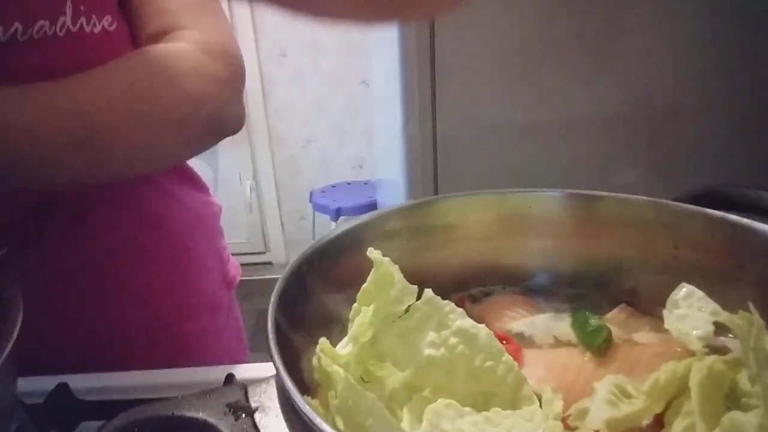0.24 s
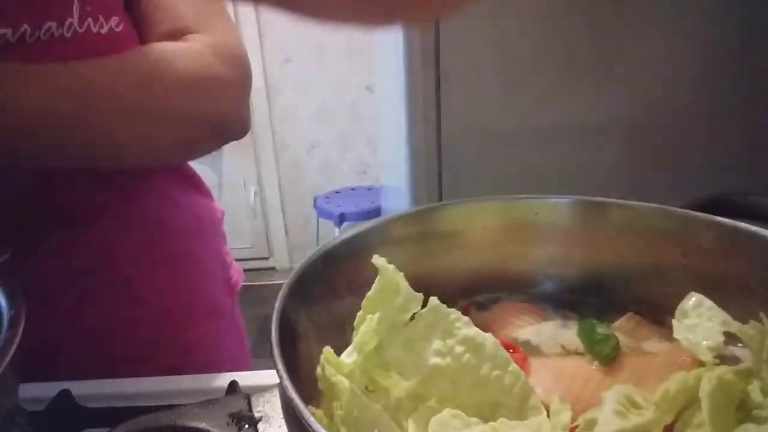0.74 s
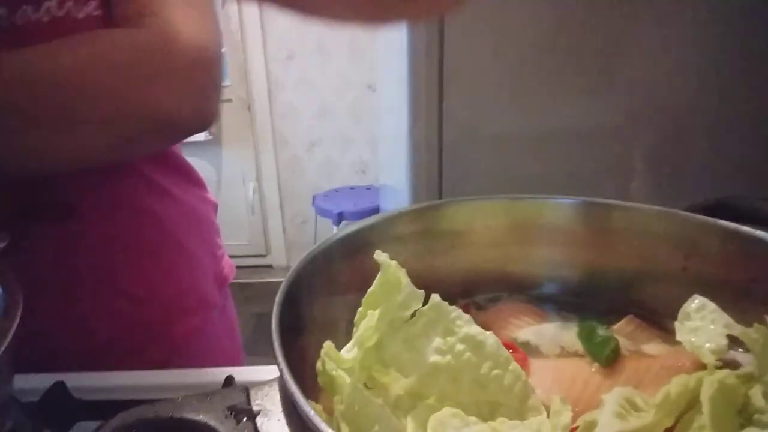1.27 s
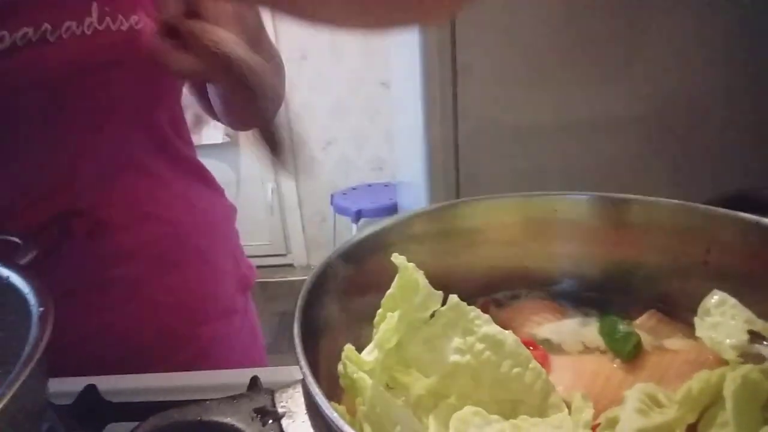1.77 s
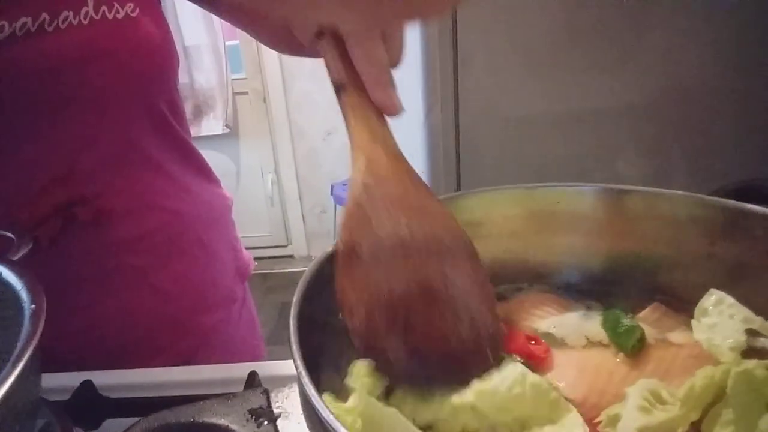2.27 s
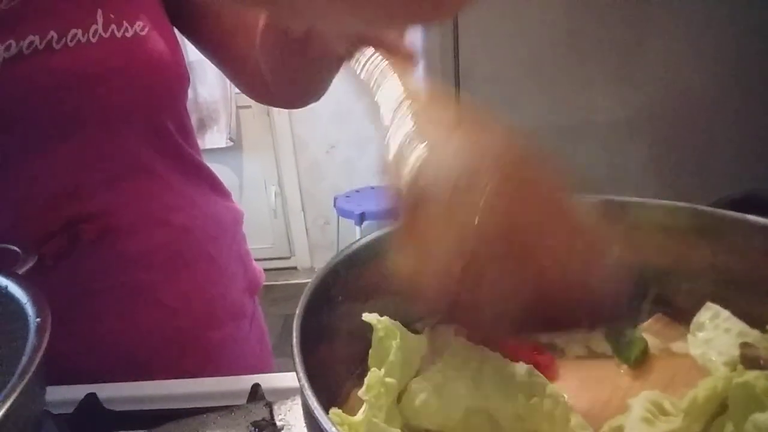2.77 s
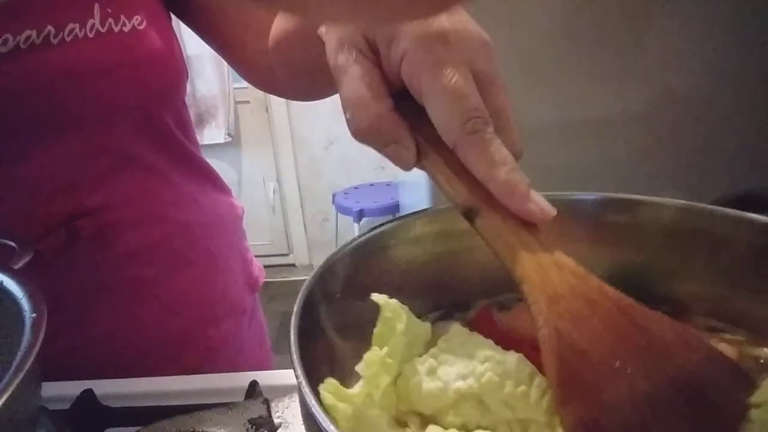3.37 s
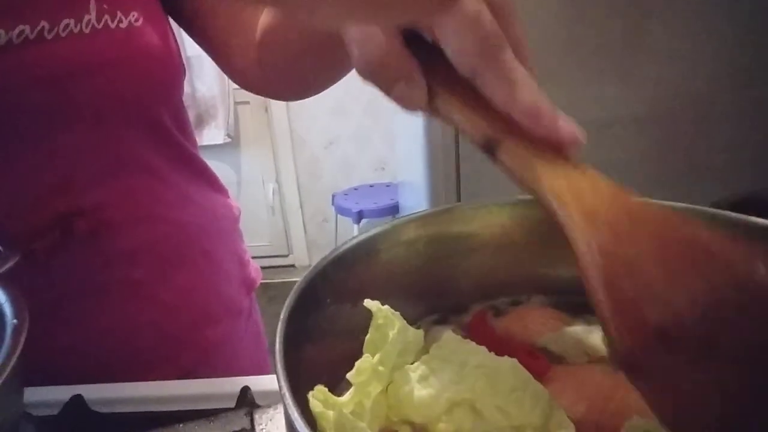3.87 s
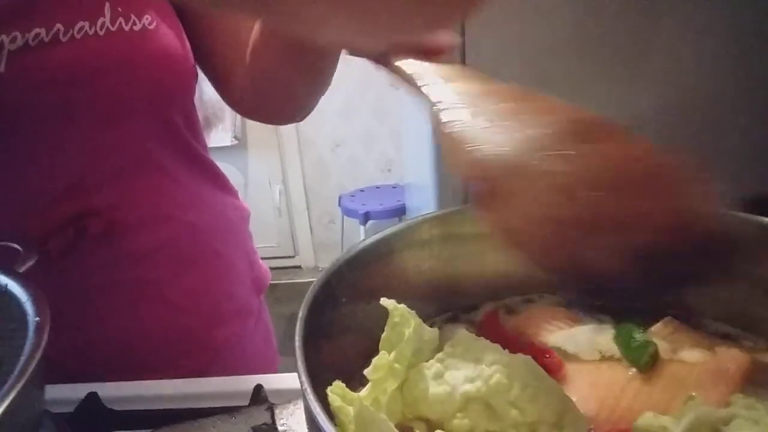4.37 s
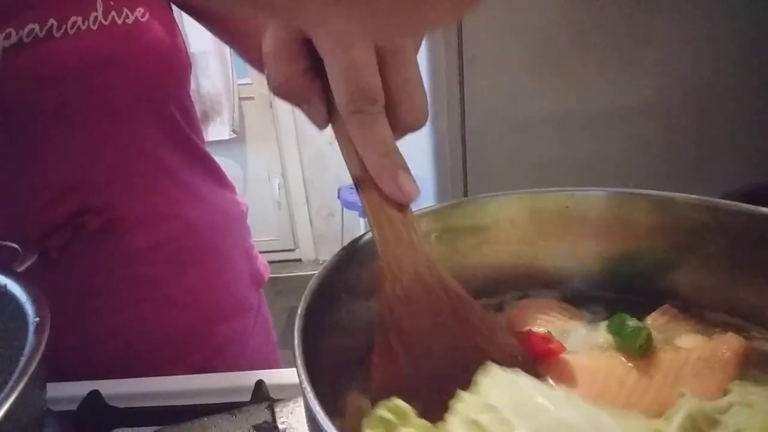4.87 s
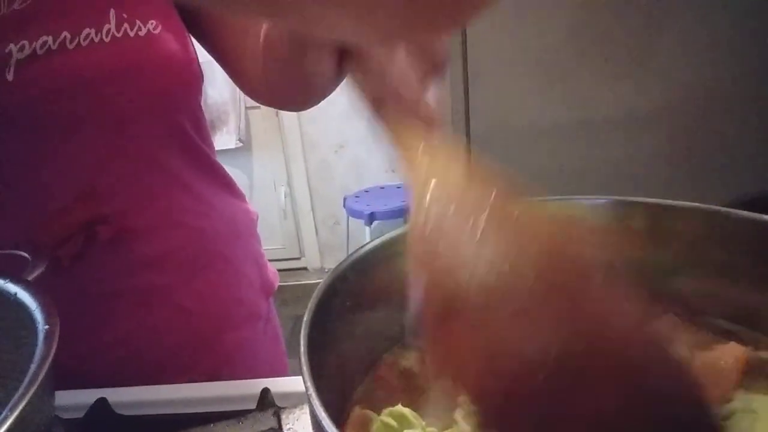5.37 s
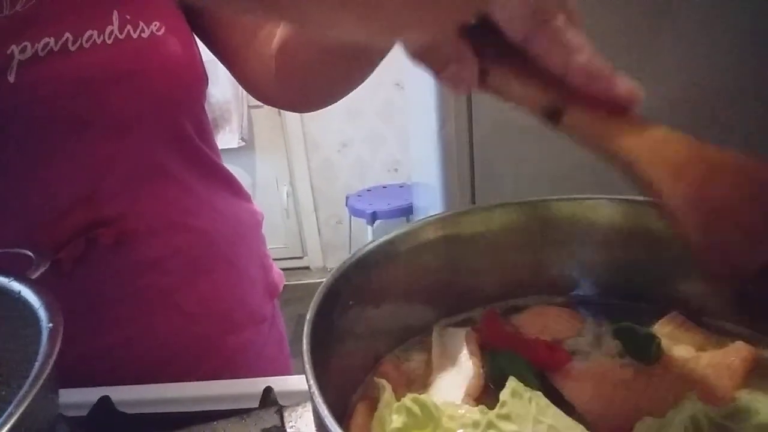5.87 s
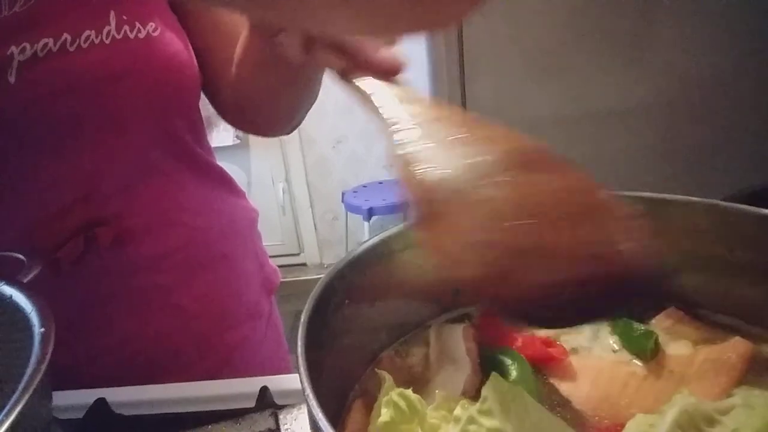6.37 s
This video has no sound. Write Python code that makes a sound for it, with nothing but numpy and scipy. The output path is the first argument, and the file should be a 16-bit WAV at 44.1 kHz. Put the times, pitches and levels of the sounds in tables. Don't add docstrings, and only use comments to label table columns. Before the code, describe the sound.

Wet leaves crackle softly under a wooden spoon, then two hard, short-ringing knocks on a full steel pot with broth splashes, over steady fan hum.

```python
import sys
import numpy as np
from scipy import signal
from scipy.fft import rfft, irfft, next_fast_len
from scipy.io import wavfile
from scipy.ndimage import map_coordinates

SR = 44100
rng = np.random.default_rng(int(sys.argv[2]) if len(sys.argv) > 2 else 0)


def invert_db(x):
    u = np.asarray(x, float) / 20
    return 10 ** u


def generate_wav(sig):
    pcm = np.round(np.clip(np.atleast_2d(sig).T, -1, 1) * 32767).astype(np.int16)
    wavfile.write(sys.argv[1], SR, pcm)


N = 292824

# frequency in Hz, level in dB rms, line width in Hz.
FAN_TONES = [(96.6, -54, 7.6), (169.7, -56, 9), (247, -60, 12)]
# frequency in Hz, density in dB per Hz.
FAN_AIR = [(18, -34), (40, -12), (70, -5.5), (130, -2), (220, -7.5), (400, -12), (950, -16), (2100, -15.5),
           (2900, -19.5), (3400, -27.5), (6500, -30.5), (12900, -36.5), (13300, -37.5), (15700, -34.5)]
# frequency in Hz, width in Hz, level in dB above the air.
HOOD_MODES = [(300, 19, 1), (740, 91, 8), (1040, 8.4, 12.5), (1342, 59, 11), (1400, 29, -5),
              (1470, 31, 8.5), (1571, 30, 15), (1640, 26, 8), (1860, 15, 5.5), (2662, 48, 15),
              (4100, 300, 10.5), (5330, 26, 15), (6300, 58, -3), (7300, 52, 3), (8000, 390, -1),
              (9800, 50, 6), (11080, 60, 9.5), (11880, 220, 7), (12500, 550, 6.5)]
FAN_DB = -47.5

# loudest moment in seconds, stroke in seconds, crackle in dB, wet share in dB.
RUSTLE = [(.33, 0.14, -69, 2), (1.08, 0.036, -58, -5), (1.19, 0.042, -52, 2.5), (1.309, 0.025, -48.5, 4.5),
          (1.48, .018, -49, 2.5), (2.14, .11, -54, -4), (2.34, 0.035, -51, -3), (2.43, 0.059, -48, -2.5),
          (2.51, 0.053, -54.5, -2), (3.15, 0.056, -47.5, 2), (3.2, 0.019, -60, 2), (3.31, .074, -54.5, 5),
          (3.48, .04, -61, 6), (3.9, .18, -61, 4), (4.72, 0.1, -59.5, 6), (5.44, 0.049, -59, 7),
          (6.04, .055, -52, 1.5), (6.61, .03, -66, -3)]
# frequency in Hz, density in dB per Hz.
CRACKLE = [(1760, -13), (3000, -17), (4870, 1.5), (6500, -5), (8600, -2), (9300, -8), (15500, -8)]
# frequency in Hz, density in dB per Hz.
WET = [(500, -40), (1000, -17), (2200, -0.5), (4200, -3), (7000, -11.5), (12000, -54)]
RISE_SHARE, FALL_SHARE = 0.7, 1.3

# start in seconds, peak in dB, centre in Hz.
SNAPS = [(.3194, -43, 4620), (.428, -41, 4000), (1.035, -39.5, 3980), (1.067, -27, 5750),
         (1.112, -40, 6950), (1.1617, -42, 4500), (1.249, -41, 6460), (1.3861, -40.5, 4100),
         (2.319, -37, 5330), (3.082, -41, 7000), (3.161, -34, 5900), (3.82, -47, 5000), (4.236, -44, 7900),
         (4.975, -47, 5500), (5.008, -45, 5000), (5.176, -45, 7760), (5.415, -44, 5500), (5.437, -37, 5460),
         (6.617, -42, 5500)]
# start in seconds, peak in dB, centre in Hz.
SCRAPES = [(1.175, -32.5, 4070), (1.204, -37, 5500), (1.3085, -36, 4500), (1.473, -35, 3500),
           (3.0493, -31, 2700), (3.127, -36, 3000), (3.138, -36, 2200), (3.187, -27, 3480),
           (3.198, -37, 3580), (3.287, -31.5, 2200), (3.304, -34, 2100)]
# start in seconds, peak in dB, centre in Hz.
SPLITS = [(1.304, -31, 5830), (2.096, -42, 6500), (2.1117, -39, 7500), (2.1334, -44, 8000),
          (2.345, -39, 4840), (2.397, -36, 5750), (2.4225, -32, 8050), (2.5031, -32, 6000),
          (3.4494, -47, 5500), (3.9018, -42, 5500), (5.7123, -38, 7300), (1.181, -42, 7500),
          (1.472, -42, 11000)]
# start in seconds, peak in dB, centre in Hz.
DRIPS = [(1.426, -44, 6000), (3.573, -48, 12500), (1.4526, -35, 6040), (2.3757, -49, 7850),
         (2.475, -39, 9050), (3.541, -43, 12000), (4.7008, -36, 10000), (4.7757, -27, 6600),
         (4.805, -37, 5000), (5.2694, -52, 9000), (5.3792, -45, 9000), (5.4827, -31.5, 7000)]
# start in seconds, peak in dB, centre in Hz.
SPLASHES = [
    (4.6488, -22.5, 7300),
    (4.6492, -29, 4400),
    (4.7108, -28, 4900),
    (4.751, -38, 5500),
    (5.9078, -22, 6300),
    (6.0189, -14.5, 5200),
    (6.0186, -21, 11800),
    (6.0187, -21, 2700),
]
# body in dB, air in dB, t60 in seconds, attack in seconds, opening tick in dB.
SNAP_KIND = (-16, -21, .045, .0025, -20)
SCRAPE_KIND = (0, -27, .028, .0006, 4)
SPLIT_KIND = (-5, -10, .035, .003, -20)
DRIP_KIND = (-12, 1, .02, .0002, 6)
SPLASH_KIND = (-4, -16, .04, .0002, 5)
TICK_T60_S = 0.0054

# start in seconds, peak in dB, resonance in Hz.
SHOVES = [(.351, -42, 360), (1.07, -33.5, 410), (1.16, -34, 300), (1.17, -35, 553), (1.298, -27, 1040),
          (1.33, -34, 90), (1.47, -26, 288), (2.149, -35, 350), (2.2, -43, 230), (2.27, -35, 405),
          (2.63, -38, 620), (3.13, -30.5, 70), (3.3, -39, 80), (3.45, -38, 270), (3.799, -48, 406),
          (6.611, -30, 240), (6.612, -22, 111), (6.614, -27, 70)]
# start in seconds, peak in dB, resonance in Hz.
ROCKING = [(4.585, -21, 410), (4.6, -34, 203), (4.602, -25, 1350), (4.61, -40, 705), (4.66, -34, 1000),
           (4.671, -24.5, 340), (4.71, -32, 473), (4.72, -30, 200), (4.73, -29.5, 300), (4.76, -37.5, 475),
           (5.91, -13.5, 545), (5.93, -24.5, 408), (5.941, -12.5, 270), (5.95, -35, 1400),
           (5.96, -35, 1950), (6.05, -36, 203)]
# t60 in seconds at the middle resonance, exponent lengthening low ones.
SHOVE_RING = (0.13, 0.3)
ROCK_RING = (0.23, .05)
MIDDLE_HZ = 400
HARD_DB, LINGER = -28.5, 0.3

# start in seconds, blow in dB, stove thud in dB, tail in dB, crack in dB.
KNOCKS = [
    (4.5503, 1, -34.5, -24, -17.5),
    (5.8966, 4, -36, -19, -28),
    (6.6072, -22.5, -48.5, -39, -25),
]
# frequency in Hz, width in Hz, level in dB.
RIM_FAR = [(340, 33, -28), (410, 20, -31), (610, 30, -30), (704, 28, -12), (1000, 44, -12), (1180, 33, -34),
           (1350, 31, 6.5), (1440, 42, 3), (1600, 80, -4), (1878, 54, 0), (2006, 28, -7), (2490, 60, -11),
           (2650, 85, -10), (3470, 110, -15), (3740, 120, -10), (4240, 200, -16), (5440, 210, -14),
           (7900, 760, -8)]
# frequency in Hz, width in Hz, level in dB.
RIM_NEAR = [(230, 90, -25), (270, 20, 0), (407, 25, -16), (545, 40, 11), (620, 25, -1), (820, 50, -16),
            (1020, 42, -3), (1343, 14, 11.5), (1490, 42, 8), (1630, 46, -3), (1940, 62, -2),
            (2193, 77, 6.5), (2220, 59, -6), (2404, 67, 1.5), (2500, 63, 4), (2650, 160, -32),
            (3550, 100, -20), (4170, 260, -32), (4930, 240, -11), (6900, 400, -29)]
# frequency in Hz, width in Hz, level in dB.
RIM_SOFT = [(230, 80, -8), (704, 140, 5), (1130, 220, -6), (1510, 230, 0), (2070, 400, -11)]
# delay in seconds, level in dB.
WALLS = [(.0029, -11), (.0085, -7), (0.01, -7), (0.021, -14.5)]
ECHO_DB = -4
# frequency in Hz, t60 in seconds.
KITCHEN = [(80, 0.95), (250, 0.31), (700, 0.43), (2000, 0.27), (5000, 0.23), (12000, 0.23)]
# frequency in Hz, density in dB per Hz.
TAIL_FAR = [(71, -32), (120, -9), (246, -3.5), (410, 5), (503, -18), (712, 2.5), (856, -4.5), (2020, 1.5),
            (2240, -7), (2590, -6), (3050, -7), (8140, -16), (16000, -46)]
# frequency in Hz, density in dB per Hz.
TAIL_NEAR = [(71, -26), (120, -13), (196, -16), (261, -7.5), (370, -12), (410, -13), (839, -24),
             (1370, -13.5), (1720, -15), (1980, -15), (2200, -18), (2530, -23), (16000, -58)]
# frequency in Hz, t60 in seconds, level in dB.
STOVE = [(78.4, 0.52, 1.5), (101.6, 0.3, -2), (134, 0.35, -3.5)]
EDGE_HZ, EDGE_DB = 9200, -7

# frequency in Hz, gain in dB.
TOP_LIMIT = [(15720, 0), (15800, -38), (16900, -40), (17000, -90)]
# start in seconds, depth in dB (negative lifts), release in seconds.
DUCK = [
    (4.55, 4.5, 3.7),
    (5.896, -0.5, 2),
]


def unit(x):
    return x / np.sqrt(np.mean(x ** 2) + 1e-20)


def along(points, hz):
    f, v = np.transpose(points)
    return np.interp(np.log(hz + 1), np.log(f + 1), v)


def filtered(x, response):
    m = next_fast_len(len(x) + SR // 10)
    return irfft(rfft(x, m) * response(np.fft.rfftfreq(m, 1 / SR)), m)[..., :len(x)]


def peak(f, hz, width_hz):
    return 1j * f * width_hz / (hz * hz - f * f + 1j * f * width_hz)


def wobble(rate):
    knots = rng.standard_normal(int(N * rate / SR) + 4)
    return map_coordinates(knots, [np.arange(N) * rate / SR])


def add(track, s, sound):
    part = track[round(s * SR):][:len(sound)]
    part += sound[:len(part)]


def tail(colour):
    hz, t, z = signal.stft(rng.standard_normal(SR // 2), SR, nperseg=512)
    decay_db = along(colour, hz)[:, None] - 60 * t / along(KITCHEN, hz)[:, None]
    answer = signal.istft(z * invert_db(decay_db), SR, nperseg=512)[1]
    answer = answer * (1 - np.exp(-np.arange(len(answer)) / SR / 0.0027))
    return answer / np.linalg.norm(answer)


def fan():
    def hood(f):
        gain = sum(invert_db(2 * db) * abs(peak(f, c, w)) ** 2 for c, w, db in HOOD_MODES)
        return invert_db(along(FAN_AIR, f)) * np.sqrt(1 + gain)

    level_db = FAN_DB + 0.33 * wobble(2.01) + 0.64 * wobble(14)
    out = invert_db(level_db) * unit(filtered(rng.standard_normal(N), hood))
    t = np.arange(N) / SR
    for hz, db, width_hz in FAN_TONES:
        sway = 1 + 0.44 * (wobble(width_hz) + 1j * wobble(width_hz))
        out += invert_db(db + 2.5) * np.real(sway * np.exp(2j * np.pi * hz * t))
    return out


def rustle():
    t = np.arange(0, N + 64, 64) / SR
    dry_gain, wet_gain = np.zeros(len(t)), np.zeros(len(t))
    for s, stroke, db, wet_db in RUSTLE:
        side_s = stroke * np.where(t < s, RISE_SHARE, FALL_SHARE)
        swell = np.exp(-((t - s) / side_s) ** 2)
        dry_gain += invert_db(db) * swell
        wet_gain += invert_db(db + wet_db) * swell

    def grains(colour):
        clumped = rng.standard_normal(N) * invert_db(2.6 * wobble(70) + 2.3 * wobble(900))
        return unit(filtered(clumped, lambda f: invert_db(along(colour, f))))

    now = np.arange(N) / SR
    return np.interp(now, t, dry_gain) * grains(CRACKLE) + np.interp(now, t, wet_gain) * grains(WET)


def snaps():
    out, t = np.zeros(N), np.arange(SR // 8) / SR
    kinds = ((SNAPS, SNAP_KIND), (SCRAPES, SCRAPE_KIND), (SPLITS, SPLIT_KIND),
             (DRIPS, DRIP_KIND), (SPLASHES, SPLASH_KIND))
    events = [row + kind for rows, kind in kinds for row in rows]
    for s, db, hz, body_db, air_db, t60, attack_s, tick_db in events:
        def colour(f):
            ripple = 1 + 0.75 * peak(f, 8100, 680) - 0.49 * peak(f, 1.182 * hz, 0.14 * hz)
            band = peak(f, hz, 0.8 * hz) ** 3 * ripple
            body = invert_db(body_db + 1.0) * peak(f, 1740, 1570) ** 2
            air = invert_db(air_db) * peak(f, 11900, 6300) ** 3
            return band + body - air

        decay = invert_db(-60 * t / t60) + invert_db(tick_db - 60 * t / TICK_T60_S)
        burst = rng.standard_normal(len(t)) * decay * (1 - np.exp(-t / attack_s))
        sound = filtered(burst, colour)
        add(out, s, invert_db(db) * sound / abs(sound).max())
    room = signal.oaconvolve(out, tail([(100, 0)])[:SR // 4])[:N]
    return out + invert_db(-6.0) * room


def bumps():
    out, t = np.zeros(N), np.arange(SR // 3) / SR
    for s, db, hz, ring_s, low in [row + SHOVE_RING for row in SHOVES] + [row + ROCK_RING for row in ROCKING]:
        t60 = ring_s * (MIDDLE_HZ / hz) ** low * invert_db(LINGER * (HARD_DB - db))

        def resonance(f):
            return (peak(f, hz, 0.07 * hz + 10) + 0.3) * peak(f, hz, 0.9 * hz) ** 2

        puff = unit(filtered(rng.standard_normal(len(t)), resonance))
        add(out, s, invert_db(db - 7.0 - 60 * t / t60) * puff * (1 - np.exp(-t / 0.011)))
    return out


def knocks():
    out, t = np.zeros(N), np.arange(SR // 2) / SR
    blow = t * np.exp(-t / 0.00005)
    rims, colours = (RIM_FAR, RIM_NEAR, RIM_SOFT), (TAIL_FAR, TAIL_NEAR, TAIL_NEAR)
    for (s, db, thud_db, tail_db, crack_db), rim, colour in zip(KNOCKS, rims, colours):
        def body(f):
            total = 0
            for hz, width_hz, mode_db in rim:
                sign = 1 if hz < 1200 or hz > 3000 else -1
                total = total + sign * invert_db(mode_db) * peak(f, hz, width_hz)
            return total * peak(f, 2350, 4700)

        ring = filtered(blow, body)
        crack_burst = rng.standard_normal(len(t)) * invert_db(-60 * t / 0.034)
        crack = filtered(crack_burst, lambda f: peak(f, 3700, 3600) ** 2)
        knock = invert_db(db) * (ring / abs(ring).max() + invert_db(crack_db) * crack)
        add(out, s, knock)
        for delay, echo_db in WALLS:
            add(out, s + delay, invert_db(echo_db + ECHO_DB) * knock)
        add(out, s, invert_db(tail_db + 32) * tail(colour))
        boom = sum(invert_db(g - 60 * t / t60) * np.sin(2 * np.pi * hz * t) for hz, t60, g in STOVE)
        add(out, s, invert_db(thud_db + 15.5) * boom * (1 - np.exp(-t / 0.052)) ** 2)

    def knock_colour(f):
        shelf_db = EDGE_DB / (1 + (EDGE_HZ / (f + 1)) ** 30)
        return invert_db(shelf_db) * (1 + 0.9 * peak(f, 8350, 600))

    return filtered(out, knock_colour)


def scene():
    return (fan() + rustle() + snaps() + bumps() + knocks())[None]


def roll_off(x):
    return signal.sosfilt(signal.butter(12, 17010, fs=SR, output="sos"), x)


def record(dry):
    t = np.arange(N) / SR
    duck_db = np.zeros(N)
    for s, depth_db, release_s in DUCK:
        since = np.maximum(t - s, 0)
        duck_db += depth_db * (1 - np.exp(-since / 0.26)) * np.exp(-since / release_s)

    def band_limits(f):
        bass_cut = (1j * f / (45 + 1j * f)) ** 3
        return invert_db(along(TOP_LIMIT, f)) * bass_cut

    x = filtered(dry[0] * invert_db(-duck_db), band_limits)
    x = x / (1 + abs(x / 1.05) ** 8) ** (1 / 8)
    return roll_off(x[None])


dry = scene()
out = record(dry)
generate_wav(out)
```